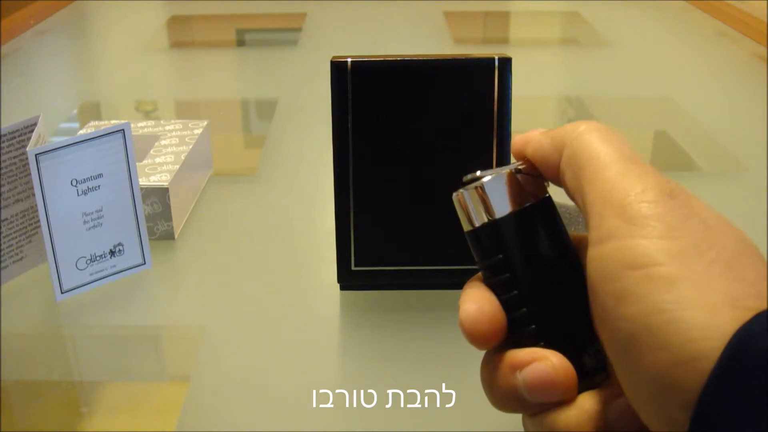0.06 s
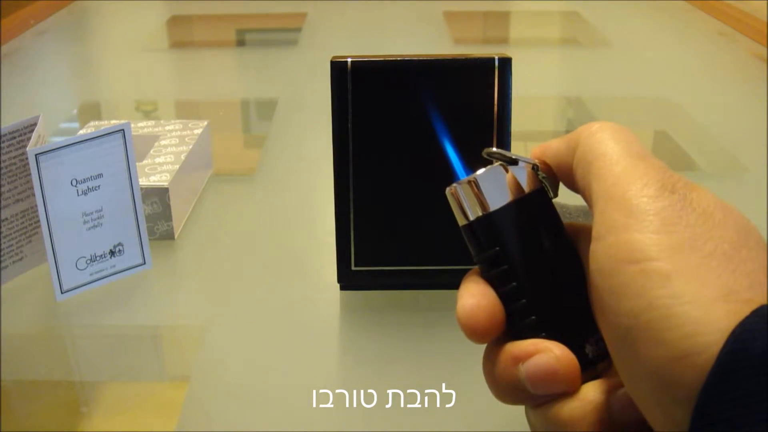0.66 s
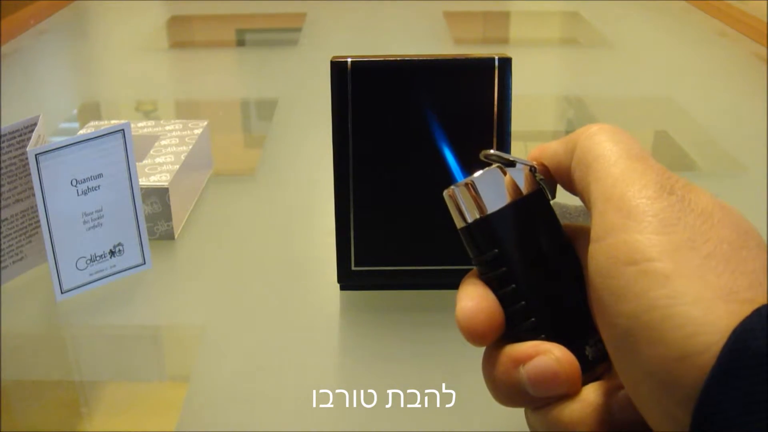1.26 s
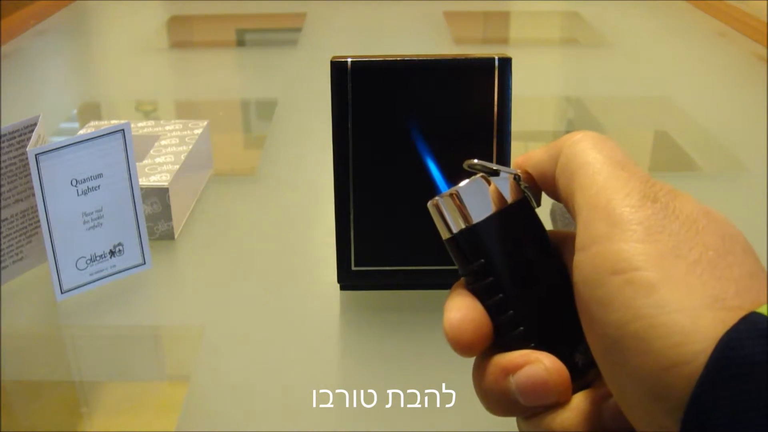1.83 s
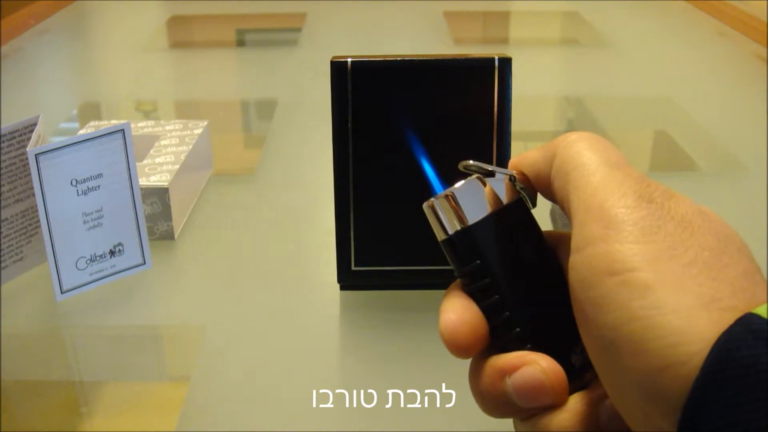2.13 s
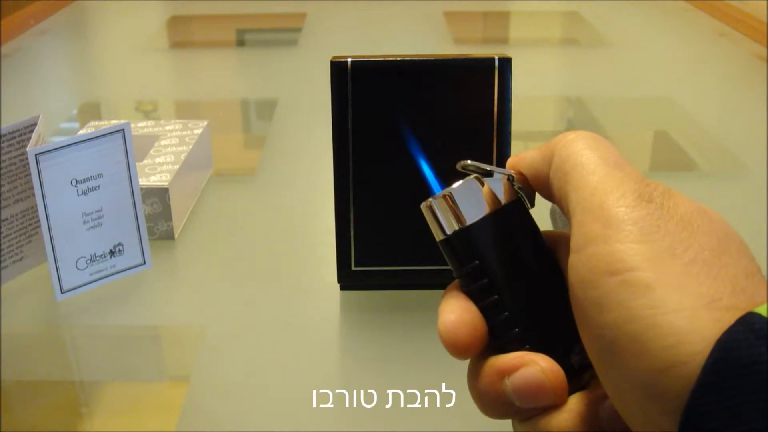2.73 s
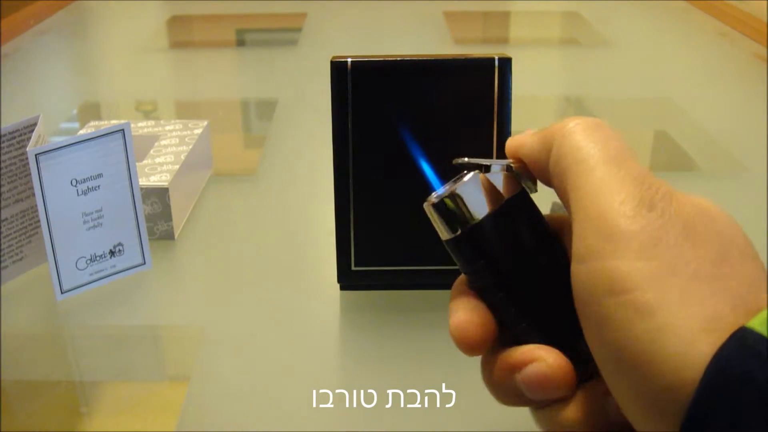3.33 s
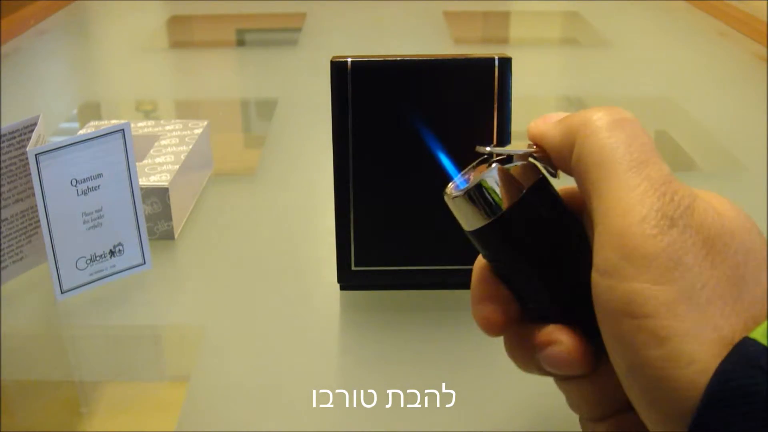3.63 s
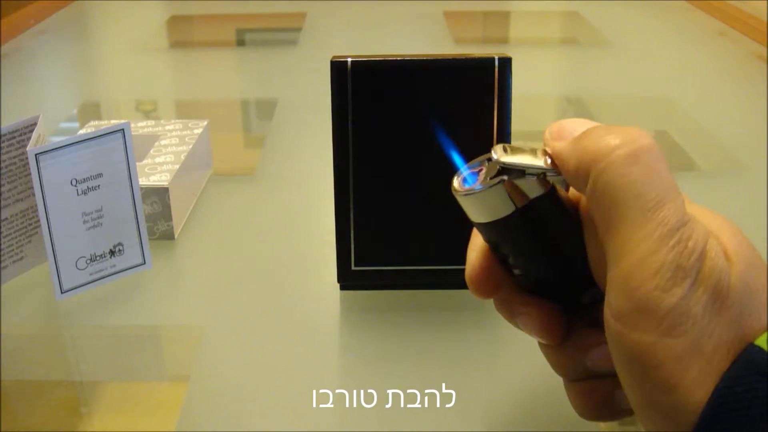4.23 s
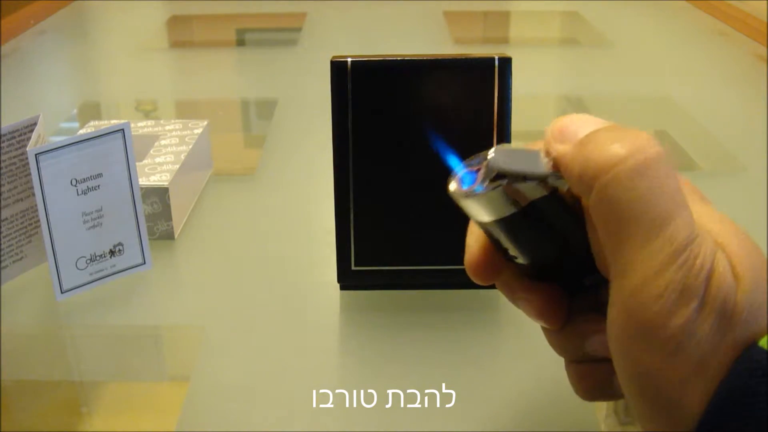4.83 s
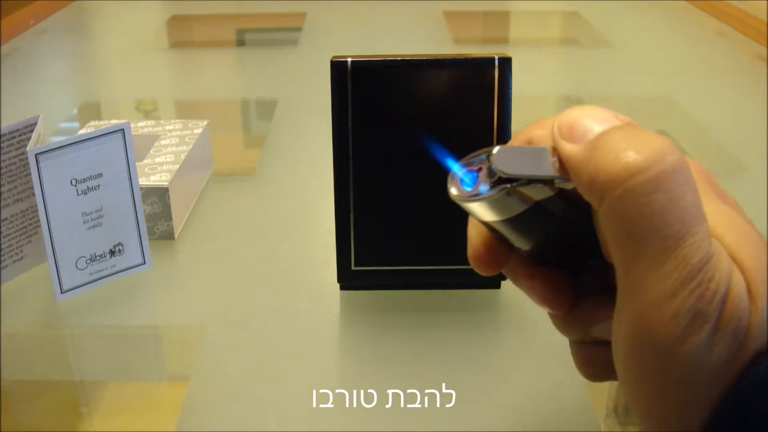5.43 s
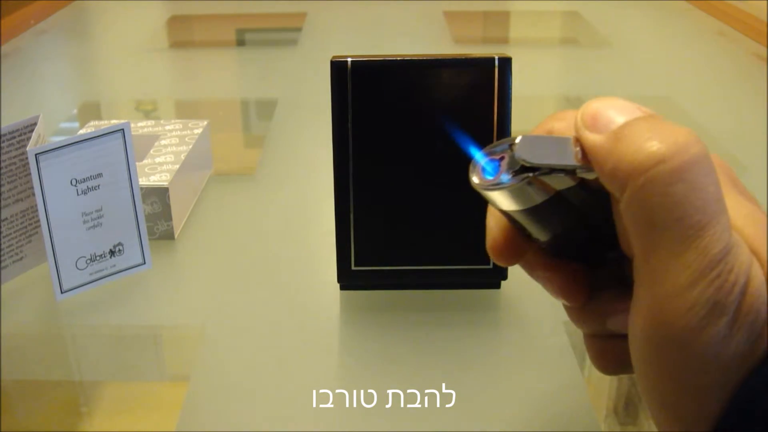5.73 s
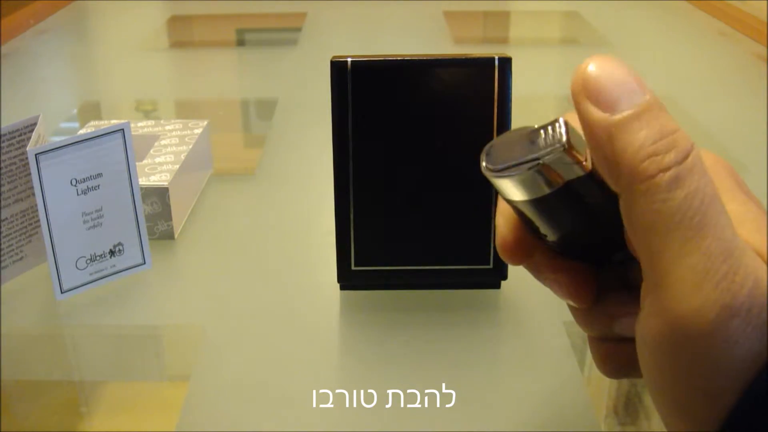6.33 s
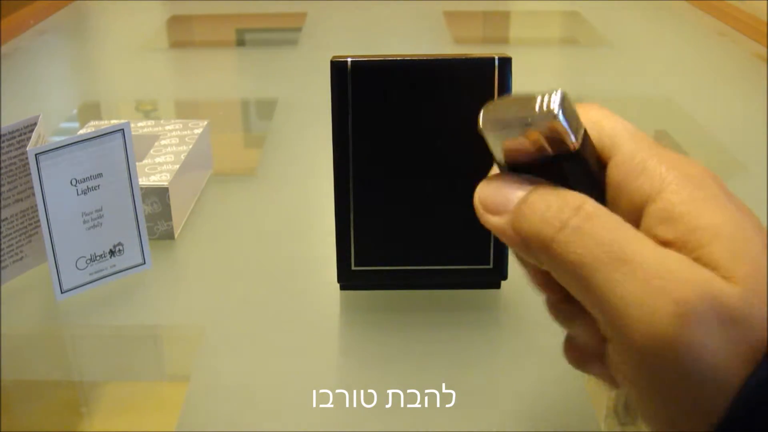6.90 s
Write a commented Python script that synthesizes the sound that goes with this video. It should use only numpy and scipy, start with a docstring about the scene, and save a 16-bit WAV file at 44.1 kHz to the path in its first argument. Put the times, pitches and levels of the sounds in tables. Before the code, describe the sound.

A gas torch lighter is heard close to the microphone in a small, live room with faint steady background noise. At about 0.3 seconds a soft, high hiss of unlit gas begins. At about 0.5 seconds the igniter gives a loud, sharp click that rings briefly in the room, and the gas catches. The jet flame burns with a steady roaring hiss, dull at first and brightening over the next second. From about 3 to 5.8 seconds the roar grows slightly louder and its tone slowly shifts as the lighter tips toward the microphone. At about 6.5 seconds the metal cap snaps shut with another loud click and a short room echo, cutting the flame off at once. A faint hiss of leftover gas leaks out until about 6.9 seconds, leaving only the quiet room.

```python
"""A gas torch lighter close to a mono camera microphone, above a desk in a small live room.
Over the room tone, cold gas hisses from the nozzle and catches as the piezo igniter snaps.
The jet flame roars, brighter as the burner warms; halfway through, the hand slowly tips it on-mic.
At the end the cap snaps shut and the last gas leaks out under it.
Both snaps duck the limiter, so the room's ring swells up after them."""
import sys
import numpy as np
from scipy import signal
from scipy.fft import rfft, irfft, next_fast_len
from scipy.io import wavfile
from scipy.ndimage import uniform_filter1d, minimum_filter1d

SR = 44100
rng = np.random.default_rng(int(sys.argv[2]) if len(sys.argv) > 2 else 0)


def inscribe(sig):
    """Save sig as 16-bit PCM at rate SR to the path in sys.argv[1].

    A 1-D sig is mono; a 2-D sig holds one channel per row.
    Samples are clipped to [-1, 1] before scaling.
    """
    pcm = np.round(np.clip(np.atleast_2d(sig).T, -1, 1) * 32767)
    wavfile.write(sys.argv[1], SR, pcm.astype(np.int16))


N = 315756
TIME = np.arange(N) / SR
GAS_ON_S, IGNITION_S, CAP_SHUT_S = 0.32, 0.5, 6.491

# the quiet room at the microphone: (frequency [Hz], relative level [dB])
ROOM_TONE_SPECTRUM = [(25, -23), (60, -17), (98, -15.5), (128, -6.5), (170, -7.5), (220, 0), (600, -0.5),
                      (1200, -3), (2000, -8.5), (4000, -14), (7000, -18), (11000, -21.5)]
# first echoes off the desk and the nearest walls: (delay [ms], level [dB])
EARLY_ECHOES = [(3.8, -27), (11.1, -22), (17.6, -29)]
# how long the room rings: (frequency [Hz], t60 [s])
ROOM_T60 = [(300, 0.64), (1500, 0.76), (4000, 0.57), (7000, 0.45), (10500, 0.44)]
# standing waves between desk and walls: (frequency [Hz], width [Hz], gain [dB])
ROOM_MODES = [(147.9, 28, -7), (286.5, 28, 8.5), (519, 9.6, 3.5), (530, 22, -3.5), (735, 39, 3),
              (1093, 26, 5.5), (1142, 28, -7), (1163, 19, 3.5), (1236, 26, -9), (1244, 26, 2.5),
              (1327, 41, -11.5), (1351, 28, 2.5), (1540, 30, 1), (1670, 36, -1.5)]
# resonances of the open nozzle: (frequency [Hz], width [Hz], relative level [dB])
NOZZLE_RESONANCES = [(1680, 520, -4.5), (2710, 800, -3.5), (4600, 600, -9.5), (5600, 700, -7),
                     (6800, 600, -10), (8400, 800, -0.5), (10180, 640, 0)]
# resonances of the cavity under the cap: (frequency [Hz], width [Hz], relative level [dB])
CAVITY_RESONANCES = [(690, 280, 0), (1090, 180, -3), (2340, 500, 4), (2950, 460, -2), (4480, 850, 1.5),
                     (5860, 450, -3), (6500, 550, 4.5), (7600, 1000, -2.5)]
# a leak under the shut cap and a faint seep that outlasts it: (end time [s], starting level [dB])
CAP_LEAKS = [(6.765, -41.0), (6.885, -56.5)]
# the igniter's spring trips, then its hammer hits and rebounds: (time [s], level [dB])
IGNITER_CONTACTS = [(.5443, -20), (.5455, 6), (.5474, -9)]
# the ring of the igniter's hammer: (frequency [Hz], gain [dB], t60 [s])
IGNITER_MODES = [(300, -41, 0.011), (1790, -5, 0.0056), (3130, -3.5, 0.0072), (3800, 2.5, 0.0062),
                 (4600, 4.5, 0.0029), (5270, 0, 0.0042), (6870, -4.5, 0.0026), (8570, -1.5, 0.0027),
                 (10000, -1, 0.0041), (10350, -1.5, 0.004)]
# the cap slides over its catch, snaps shut and rattles: (time [s], level [dB])
CAP_CONTACTS = [(6.4815, -26), (6.4848, -29), (6.486, -19), (6.4906, 6.5), (6.4922, -8), (6.495, -17)]
# the ring of the cap: (frequency [Hz], gain [dB], t60 [s])
CAP_MODES = [(1340, -21, 0.0062), (2420, -12, 0.0062), (3220, -2, 0.003), (4440, 0.5, 0.0056),
             (5000, -1.5, 0.0046), (6400, -2, 0.006), (7200, -3, 0.0046), (7660, -1.5, 0.0055),
             (8970, 0, 0.0029), (10200, -7, 0.0038), (10800, -12, 0.006)]
# the wrist turns the lighter on-mic in two moves: (start [s], length [s], added tilt [ratio])
TILT_MOVES = [(3.103, 1.3, 0.43), (4.407, 1.35, 0.6)]
# detours round cap and hand: (upright delay [ms], extra delay at full tilt [ms], signed gain [ratio])
HAND_PATHS = [(.284, 0.17, .15), (.295, 0.077, -.23), (.381, 0.091, 0.15), (.553, 0.26, -0.12),
              (.833, .267, -0.16), (.936, 0.19, -0.029), (1.1, 0.21, -.11)]
# hollows in the flame's hiss: (upright frequency [Hz], fall at full tilt [ratio], width [Hz], gain [dB])
SLIDING_NOTCHES = [(3595, 0.03, 190, -5.5), (5010, 0.29, 230, -8), (7734, 0.26, 300, -2.5),
                   (9090, 0.24, 370, -6.5)]
# the burning jet, close up: (frequency [Hz], relative level [dB])
FLAME_SPECTRUM = [(40, -52), (130.0, -20.5), (280.0, -21.5), (660.0, -5.5), (920.0, -12), (1150.0, -8),
                  (1700.0, -6.5), (2350.0, -1.87), (3000.0, -5), (4000.0, -12), (5200.0, -12.5),
                  (6500.0, -20.5), (8200.0, -21.5), (10800.0, -26.5)]


def from_db(db):
    """Decibels to gain."""
    return 10 ** (np.asarray(db) / 20)


def at_hz(points, hz):
    """Read a curve on a log-frequency axis."""
    known_hz, values = np.transpose(points)
    return np.interp(np.log(np.maximum(hz, 1)), np.log(known_hz), values)


def opens(at_s, rise_s):
    """0 before a moment, then rising exponentially towards 1."""
    return 1 - np.exp(-np.maximum(TIME - at_s, 0) / rise_s)


def delayed(x, delay_ms):
    """The same sound reaching the microphone by a longer path."""
    return np.interp(TIME - delay_ms / 1000, TIME, x)


def noise(gain_at):
    """Noise of rms 1 whose colour is a function of frequency."""
    size = next_fast_len(N)
    hz = np.arange(size // 2 + 1) * SR / size
    coloured = irfft(rfft(rng.standard_normal(size)) * gain_at(hz), size)[:N]
    return coloured / np.sqrt(np.mean(coloured ** 2) + 1e-20)


def drift(rate_hz):
    """A slow random wander of rms 1."""
    return noise(lambda hz: 1 / (1 + (hz / rate_hz) ** 2))


def below(x, edge_hz):
    """The part of a sound under a frequency, unshifted in time."""
    return signal.sosfiltfilt(signal.butter(3, edge_hz, fs=SR, output="sos"), x)


def room_tone(level_db=-50.5):
    """The bed under everything: the faint, steady noise of the room."""
    return from_db(level_db) * noise(lambda hz: from_db(at_hz(ROOM_TONE_SPECTRUM, hz)))


def room(direct, sent, ring_db=-11.5, first_s=0.0024, build_s=0.0082):
    """Close sound, desk and wall echoes, then a dense ring of what is sent out; its treble dies first."""
    age = TIME[:SR * 3 // 4]
    white = rfft(rng.standard_normal(len(age)))
    hz = np.arange(len(white)) * SR / len(age)
    edges_hz = [0, 500, 1200, 2500, 4000, 5500, 7000, 9000, 12000]
    ring = np.zeros(len(age))
    for low, high in zip(edges_hz, edges_hz[1:]):
        band = irfft(white * (hz >= low) * (hz < high), len(age))
        ring += band * from_db(-60 * age / at_hz(ROOM_T60, (low + high) / 2))
    ring *= opens(first_s, build_s)[:len(age)]
    ring *= from_db(ring_db) / np.sqrt(2 * np.sum(ring ** 2))
    echoes = sum(from_db(db) * delayed(direct, delay_ms) for delay_ms, db in EARLY_ECHOES)
    return direct + echoes + signal.fftconvolve(sent, ring)[:N]


def standing_waves(x):
    """Each standing wave lifts or hollows one narrow band where the microphone stands."""
    for hz, width_hz, db in ROOM_MODES:
        band = signal.lfilter(*signal.iirpeak(hz, hz / width_hz, fs=SR), x)
        x = x + (from_db(db) - 1) * band
    return x


def gas(resonances, flutter_db):
    """Unlit gas: a smooth hiss through the resonances of the metal around it."""
    def colour(hz):
        """Steep-sided humps, added in power."""
        humps = [from_db(db) / (1 + 2 * ((hz - centre) / width) ** 2) for centre, width, db in resonances]
        return np.sqrt(sum(hump ** 2 for hump in humps))
    return noise(colour) * from_db(flutter_db * drift(rate_hz=30.0))


def cold_gas(start_db=-43.0, catch_drop_db=6, fade_db_per_s=8.5):
    """The valve opens on a steady hiss, which drops as the gas catches and fades as the burner heats."""
    valve = opens(GAS_ON_S, rise_s=0.012)
    caught = opens(IGNITION_S, rise_s=0.096)
    burning_s = np.maximum(TIME - IGNITION_S, 0)
    level_db = start_db - catch_drop_db * caught - fade_db_per_s * burning_s
    return gas(NOZZLE_RESONANCES, flutter_db=1.0) * valve * from_db(level_db)


def last_gas(run_out_s=0.015, sag_db_per_s=9.5):
    """The gas left in the burner leaks out under the shut cap, sagging a little, until it is spent."""
    flow = sum(from_db(db) * (1 - opens(end_s, run_out_s)) for end_s, db in CAP_LEAKS)
    sag = from_db(-sag_db_per_s * np.maximum(TIME - CAP_SHUT_S, 0))
    return gas(CAVITY_RESONANCES, flutter_db=1.8) * opens(CAP_SHUT_S, rise_s=0.005) * flow * sag


def jolt(contacts, gain_db, edge_hz):
    """The hardest contact jolts the whole lighter: a short dull push of air, heard only close up."""
    at_s, db = max(contacts, key=lambda contact: contact[1])
    push = np.zeros(N)
    push[round(at_s * SR)] = from_db(db + gain_db)
    return signal.sosfilt(signal.butter(2, edge_hz, fs=SR, output="sos"), push + 1e-18)


def crack(contacts, gain_db, t60_s, low_hz):
    """Countless high, heavily damped modes blur into a brief burst of noise at each contact."""
    envelope = np.zeros(N)
    for at_s, db in contacts:
        start = round(at_s * SR)
        decay_db = 60 * np.minimum(TIME[:N - start] / t60_s, 5)
        envelope[start:] += from_db(db + gain_db - decay_db)
    bursts = envelope * rng.standard_normal(N)
    return signal.sosfilt(signal.butter(2, low_hz, "high", fs=SR, output="sos"), bursts)


def snap(contacts, modes):
    """Hard contacts ring a small part that the hand damps within milliseconds."""
    clicks, ring = np.zeros(N), np.zeros(N)
    for at_s, db in contacts:
        clicks[round(at_s * SR)] += from_db(db)
    for k, (hz, db, t60_s) in enumerate(modes):
        radius = from_db(-60 / (t60_s * SR))
        feedback = [1, -2 * radius * np.cos(2 * np.pi * hz / SR), radius ** 2]
        # neighbouring modes swing in opposite directions and radiate no bass
        ring += (-1) ** k * from_db(db) * signal.lfilter([0.5, 0, -0.5], feedback, clicks + 1e-18)
    return ring


def tilt(time_s):
    """0 upright, about 1 aimed at the microphone; each turn of the wrist eases in and out."""
    return sum(share * np.sin(np.pi / 2 * np.clip((time_s - start_s) / length_s, 0, 1)) ** 2
               for start_s, length_s, share in TILT_MOVES)


def past_the_hand(x):
    """Short detours interfere with the direct sound; tipping lengthens them, so the colour falls."""
    aimed = tilt(TIME)
    return x + sum(gain * delayed(x, upright_ms + extra_ms * aimed)
                   for upright_ms, extra_ms, gain in HAND_PATHS)


def sliding_notches(x):
    """Narrow hollows in the flame's hiss that slide down as the lighter tips."""
    hz, time_s, spectra = signal.stft(x, SR, nperseg=1024)
    dip_db = 0
    for upright_hz, fall, width_hz, db in SLIDING_NOTCHES:
        centre_hz = upright_hz * (1 - fall * tilt(time_s))
        dip_db = dip_db + db / (1 + (2 * (hz[:, None] - centre_hz) / width_hz) ** 2)
    return signal.istft(spectra * from_db(dip_db), SR)[1][:N]


def flame(gain_db=-36.0, on_mic_db=3.0, core_cold_db=-8.5, hiss_cold_db=-23.5, flutter_db=0.5):
    """Turbulent burning: a steady rumble under a core and hiss that grow as it warms and turns on-mic."""
    jet = noise(lambda hz: from_db(at_hz(FLAME_SPECTRUM, hz)))
    rumble, body = below(jet, edge_hz=1000), below(jet, edge_hz=3500)
    core, hiss = body - rumble, jet - body
    aim_db = on_mic_db * tilt(TIME)
    # gain when warm, plus a shortfall that fades as the burner heats, plus the aim
    core_db = 4.5 + core_cold_db * (1 - opens(IGNITION_S, rise_s=0.31)) + aim_db
    hiss_db = 3.0 + hiss_cold_db * (1 - opens(IGNITION_S, rise_s=0.32)) + aim_db
    roar = rumble + from_db(core_db) * core + from_db(hiss_db) * hiss
    alight = opens(IGNITION_S, rise_s=0.063) * (1 - opens(CAP_SHUT_S, rise_s=0.0028))
    return roar * alight * from_db(gain_db + flutter_db * drift(rate_hz=25.0))


def scene(flame_send_db=-0.5, igniter_send_db=1.0):
    """The lighter close up, its parts feeding the room differently; one microphone on both channels."""
    unlit = cold_gas() + last_gas()
    roar = sliding_notches(past_the_hand(flame()))
    igniter = snap(IGNITER_CONTACTS, IGNITER_MODES)
    igniter += crack(IGNITER_CONTACTS, gain_db=-12.0, t60_s=0.007, low_hz=2200)
    cap = snap(CAP_CONTACTS, CAP_MODES)
    cap += crack(CAP_CONTACTS, gain_db=-15.0, t60_s=0.0056, low_hz=2570)
    jolts = jolt(IGNITER_CONTACTS, gain_db=4.0, edge_hz=210)
    jolts += jolt(CAP_CONTACTS, gain_db=0.0, edge_hz=280)
    direct = unlit + igniter + roar + cap + jolts
    sent = unlit + from_db(igniter_send_db) * igniter + from_db(flame_send_db) * roar + cap
    at_microphone = standing_waves(room(direct, sent)) + room_tone()
    return np.tile(at_microphone, (2, 1))


def limiter(x, release_db_per_s=155.0, attack_s=0.0003):
    """A peak over full scale pulls the gain down at once; it creeps back at a steady rate."""
    over_db = np.maximum(20 * np.log10(np.abs(x).max(axis=0) + 1e-9), 0)
    released_db = release_db_per_s * TIME
    held_db = np.maximum.accumulate(over_db + released_db) - released_db
    attack = round(attack_s * SR)
    gain_db = uniform_filter1d(minimum_filter1d(-held_db, attack), attack)
    return x * from_db(gain_db)


def record(dry, cutoff_hz=11080):
    """The camera's sound chain: limiter, full-scale clipping and a steep cut of the top treble."""
    clipped = np.clip(limiter(dry), -1, 1)
    lowpass = signal.firwin(401, cutoff_hz, fs=SR)
    return signal.fftconvolve(clipped, lowpass[None], mode="same", axes=1)


dry = scene()
out = record(dry)
inscribe(out)
```